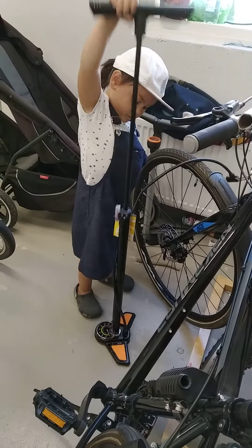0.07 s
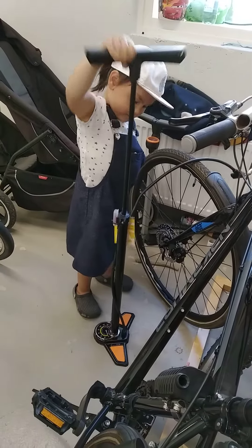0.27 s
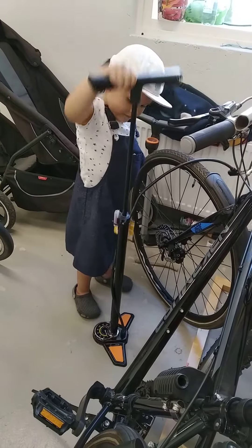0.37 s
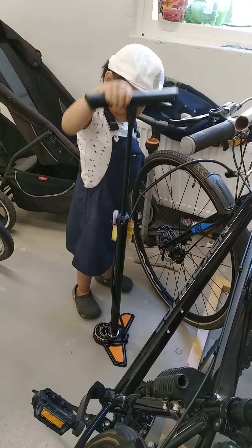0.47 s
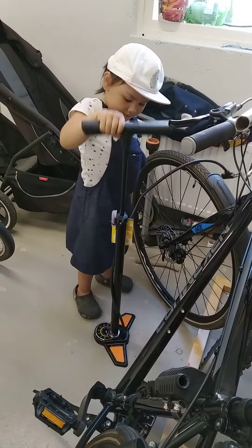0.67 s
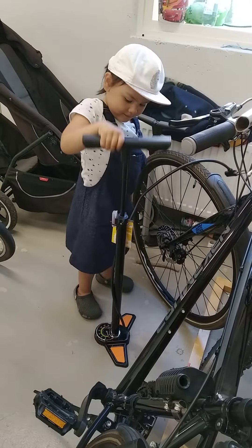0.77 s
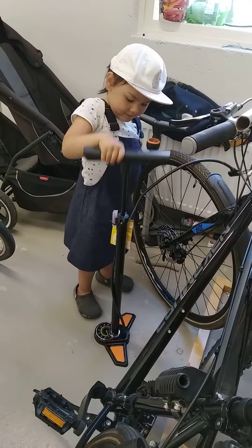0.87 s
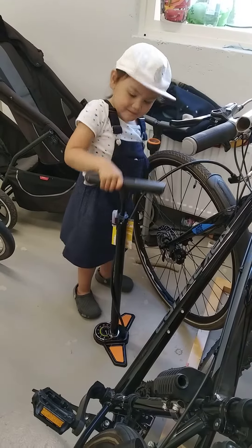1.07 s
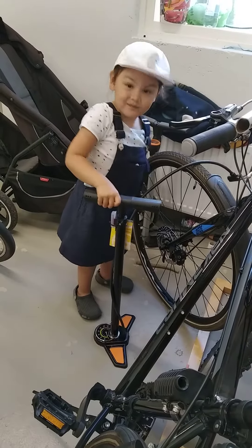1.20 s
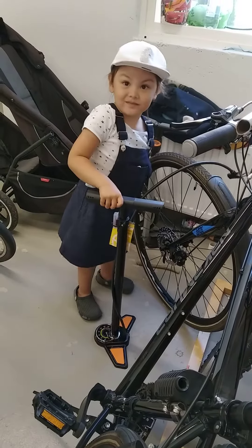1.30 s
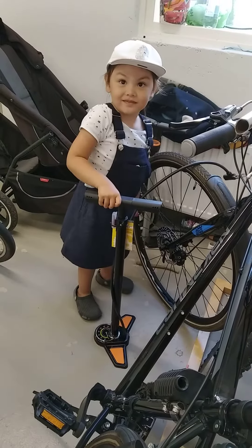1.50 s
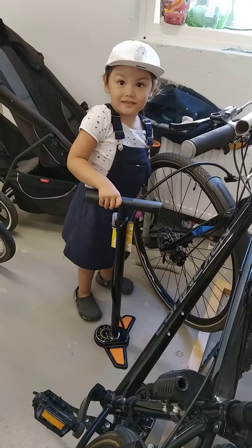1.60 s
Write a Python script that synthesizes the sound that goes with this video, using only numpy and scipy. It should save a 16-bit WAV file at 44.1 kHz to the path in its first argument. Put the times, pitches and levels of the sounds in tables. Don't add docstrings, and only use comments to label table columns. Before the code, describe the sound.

Close up in a hard-walled garage, a single pump stroke jets hissing air toward the right microphone, with a burst of metal clacks and scraping at first, faint rising hum, soft end tap, then fade-out.

```python
import sys
import numpy as np
from scipy import signal
from scipy.fft import rfft, irfft, next_fast_len
from scipy.io import wavfile
from scipy.ndimage import uniform_filter1d

SR = 44100
rng = np.random.default_rng(int(sys.argv[2]) if len(sys.argv) > 2 else 0)


def gain_from_decibels(decibels):
    exponent = np.asarray(decibels, float) / 20
    return 10 ** exponent


def waveform_to_disk(signal):
    frames = np.transpose(np.atleast_2d(signal))
    scaled = np.clip(frames, -1, 1) * 32767
    samples = np.round(scaled).astype(np.int16)
    wavfile.write(sys.argv[1], SR, samples)


N = 72765

# (frequency [Hz], level [dB])
SHADOW = [(60, -7), (330, 1.5), (800, -7.5), (1800, -3.5), (3000, -12.5), (6500, -27.5), (11500, -32),
          (13500, -59)]
# (frequency [Hz], level [dB], decay by 60 dB [s])
BARREL = [(429, -17.5, 0.1), (580, -3.5, 0.076), (757.5, -10, 0.083), (961, -12, 0.16),
          (1030.6, -1.25, 0.14), (1050.6, -12, 0.11), (1247, -13.5, .05), (1362, 4.5, 0.034),
          (1628, -1.5, 0.026), (1815, -12, 0.036), (2070, -4, 0.034), (2353, -8.5, 0.077),
          (2606, -6, 0.049), (3000, -32, 0.048)]


def rms_one(x):
    return x / np.sqrt(np.mean(x ** 2) + 1e-20)


def in_time(rows, outside=None):
    s, *cols = np.transpose(rows)
    return [np.interp(np.arange(N) / SR, s, c, outside, outside) for c in cols]


def at_hz(points, hz):
    table_hz, value = np.array(points)[:, 0], np.array(points)[:, 1]
    return np.interp(np.log(hz), np.log(table_hz), value)


def bin_hz():
    return np.maximum(np.fft.rfftfreq(N, 1 / SR), 1)


def drift(rate_hz):
    hop, settle = 40, 2000
    r = np.exp(-2 * np.pi * rate_hz * hop / SR)
    noise = rng.standard_normal(N // hop + settle + 2)
    slow = signal.lfilter([1], [1, -2 * r, r * r], noise)[settle:]
    return np.interp(np.arange(N) / hop, np.arange(len(slow)), rms_one(slow))


def sides(pan_db):
    balance = np.cosh(np.asarray(pan_db) * np.log(10) / 40)
    return gain_from_decibels(np.multiply.outer([.5, -.5], pan_db)) / balance


def swell(s, length):
    u = np.clip((np.arange(N) / SR - s) / length, 0, None)
    return u * np.exp(1 - u)


def ring(clicks, hz, t60):
    r = gain_from_decibels(-60 / (max(t60, .005) * SR))
    w = 2 * np.pi * hz / SR
    return signal.lfilter([.5, 0, -.5], [1, -2 * r * np.cos(w), r * r], clicks + 1e-18)


def air(spectrum, patchy_db, edge_hz, lowest_hz, bands, per_octave):
    # (frequency [Hz], likeness [0-1])
    likeness = [(60, 0.51), (180, 0.8), (550, 1), (1650, 0.5), (4970, -0.0), (15000, 0)]
    edge_db_per_octave, edge_depth_db = 40.5, 8.5
    hz = bin_hz()
    mid, side = rfft(rng.standard_normal((2, N))) * gain_from_decibels(at_hz(spectrum, hz))
    alike = np.clip(at_hz(likeness, hz), 0, 1)
    shared, apart = np.sqrt(1 + alike) * mid, np.sqrt(1 - alike) * side
    pair = np.array([shared + apart, shared - apart]) * sides(at_hz(SHADOW, hz))
    out, together = 0, drift(6.5)
    for k in range(bands):
        centre = lowest_hz * 2 ** (k / per_octave)
        mask = np.clip(1 - per_octave * abs(np.log2(hz / centre)), 0, 1)
        cut_db = np.clip(edge_db_per_octave * np.log2(edge_hz / centre), 0, edge_depth_db)
        flicker_db = patchy_db * (0.44 * together + drift(18))
        out = out + gain_from_decibels(flicker_db - cut_db) * irfft(pair * mask, N)
    return out / np.std(out.mean(axis=0))


def garage_hum():
    # (frequency [Hz], density [dB per Hz])
    hum_colour = [(40, -22.5), (80, -13.5), (125, -0.7), (200, -13), (330, -6), (1200, -4), (1900, -13),
                  (3400, -4)]
    # (time [s], level [dB])
    fader = [(0.05, -105), (0.1, -78), (0.2, -55.5), (0.6, -50), (1.0, -50.5), (1.36, -45.5), (1.47, -63),
             (1.65, -80.5)]
    hum = air(hum_colour, patchy_db=2, edge_hz=1, lowest_hz=40, bands=20, per_octave=3)
    return gain_from_decibels(in_time(fader, -140)[0]) * hum


def thumps():
    # (time [s], level [dB], frequency [Hz], length [s])
    plate_rocks = [
        (0.27, -49, 118, 0.05),
        (0.48, -42.5, 252, 0.0087),
        (0.83, -58.5, 140, 0.039),
        (0.92, -56, 143, 0.027),
        (1.07, -51, 134.8, 0.012),
        (1.295, -51, 163.2, 0.034),
    ]
    out = 0
    for s, db, hz, length in plate_rocks:
        tone = np.sin(2 * np.pi * hz * (np.arange(N) / SR - s))
        out = out + gain_from_decibels(db) * swell(s, length) ** 2 * tone
    return out


def column():
    # (time [s], frequency [Hz], level [dB])
    column_path = [(0.6, 341, -74), (0.68, 329.4, -64), (0.79, 347.7, -58), (0.86, 263, -71),
                   (0.96, 284.4, -57), (1.12, 331, -69), (1.19, 362.5, -56.5), (1.27, 367.4, -47),
                   (1.5, 377, -75)]
    wobble_hz, flutter_db, pan_db = 3, 2, 2.5
    hz, db = in_time(column_path)[0], in_time(column_path, -120)[1]
    phase = 2 * np.pi * np.cumsum(hz + wobble_hz * drift(14)) / SR
    tone = np.sqrt(2) * np.sin(phase)
    return gain_from_decibels(db + flutter_db * drift(17)) * tone * sides([pan_db])


def rub():
    # (time [s], level [dB])
    rubbing = [(0.22, -67), (0.24, -37.5), (0.33, -39.5), (0.38, -32.5), (0.44, -38.5), (0.52, -38.5),
               (0.62, -62.5), (0.75, -63), (1.15, -67), (1.27, -50.5), (1.34, -54.5), (1.42, -76)]
    # (frequency [Hz], density [dB per Hz])
    scrape_colour = [(300, -6.5), (1000, 5), (2500, 4.5), (4000, -3), (7500, 3.5), (8300, -28.5),
                     (11000, -4), (14000, -47.5)]
    slips_per_s, grain_db = 1200, 2
    chatter_db, chatter_pan_db = -8, -1
    scrape_db, scrape_pan_db = 6, 2.5

    strength = gain_from_decibels(grain_db * np.minimum(rng.exponential(1, N), 4))
    slips = strength * rng.choice([-1, 1], N) * (rng.random(N) < slips_per_s / SR)
    dealt = rng.random((len(BARREL), N)) < .5
    chatter = rms_one(sum(gain_from_decibels(db) * ring(slips * d, hz, t60) for d, (hz, db, t60) in zip(dealt, BARREL)))

    spectrum = rfft(rng.standard_normal((2, N))) * gain_from_decibels(at_hz(scrape_colour, bin_hz()))
    scrape = rms_one(irfft(spectrum, N)) * gain_from_decibels(1.6 * drift(30))

    both = gain_from_decibels(chatter_db) * chatter * sides([chatter_pan_db])
    both = both + gain_from_decibels(scrape_db) * scrape * sides([scrape_pan_db])
    return gain_from_decibels(in_time(rubbing, -120)[0]) * both


def knocks():
    # (time [s], level [dB], left-right [dB], pitch the contact favours [Hz], contact time [s])
    rod_hits = [(0.237, -31, -10, 900, .012), (0.25, -27.5, 4, 600, .03), (0.334, -21, 4, 580, 0.0035),
                (0.338, -21.5, 3, 1600, 0.0026), (0.372, -15, 6, 1020, 0.0016),
                (0.372, -24, 9.5, 1460, 0.0023), (0.399, -20, 9, 1640, 0.0014),
                (0.406, -21, 4.5, 1010, 0.0032), (0.418, -21, 6.5, 1025, 0.0087),
                (0.463, -16, 0.5, 2520, 0.012), (0.469, -25.5, -1, 1490, .01),
                (0.487, -16, 11, 1650, 0.003), (0.503, -24.5, 5, 1090, 0.014), (0.513, -23, 1, 1880, 0.014),
                (0.562, -35.5, 5.5, 1035, 0.0065), (0.636, -35, 3, 986, 0.0025),
                (1.267, -32, -2, 580, 0.01), (1.305, -34, -4, 1334, 0.0017), (1.306, -46, 4, 700, .008)]
    touch_cut_hz, clean_contact_s = 3500, 0.0026
    contact_db_per_octave, mode_spread_db = 14, 2.0
    grit_len, tail_len = 4000, 8000
    out = np.zeros((2, N))
    grit = rng.standard_normal((len(rod_hits), grit_len))
    luck = rng.standard_normal((len(rod_hits), len(BARREL)))
    soft = signal.butter(2, touch_cut_hz, fs=SR)
    for (s, db, pan_db, favoured_hz, contact_s), noise, spread in zip(rod_hits, grit, luck):
        gritty = contact_s / (contact_s + clean_contact_s)
        dying = np.exp(-np.arange(grit_len) / SR / contact_s) / np.sqrt(contact_s * SR / 2)
        push = gritty * noise * dying
        push[0] += 1 - gritty
        push = signal.lfilter(*soft, np.pad(push, (0, tail_len)) + 1e-18)
        body = 0
        for (hz, mode_db, t60), chance in zip(BARREL, spread):
            off_pitch_db = contact_db_per_octave * abs(np.log2(hz / favoured_hz))
            body = body + gain_from_decibels(mode_db - off_pitch_db + mode_spread_db * chance) * ring(push, hz, t60)
        i = int(s * SR)
        out[:, i:i + len(body)] += (gain_from_decibels(db) * sides([pan_db]) * body)[:, :N - i]
    return out


def garage(x):
    room_t60_s, wall_cut_hz, wide_hz = 0.47, 4100, 900
    size = next_fast_len(N + SR)
    z = np.exp(-2j * np.pi * np.arange(size // 2 + 1) / size)
    dull = np.exp(-2 * np.pi * wall_cut_hz / SR)
    wall = (1 - dull) / (1 - dull * z)
    out = np.zeros((2, len(z)), complex)
    for k, lag in enumerate((rng.uniform(.008, .04, 20) * SR).astype(int)):
        loop = gain_from_decibels(-60 * lag / SR / room_t60_s) * wall * z ** lag
        out[k % 2] += loop / (1 - loop) * (-1) ** (k // 2)
    wide = np.clip(np.arange(len(z)) * SR / size / wide_hz, 0, 1)
    out = wide * out + (1 - wide) * out[0]
    return irfft(out * rfft(x, size), size)[:, :N]


def whistles():
    # (time of peak [s], length [s], frequency [Hz], level over the flow [dB])
    nozzle_whistles = [
        (0.12, .04, 4380, -6.5),
        (0.72, 0.094, 4370, -10.5),
        (0.53, 0.032, 5700, -9.5),
        (0.38, .04, 6550, -9.5),
        (0.98, 0.11, 6000, -5),
    ]
    half_width_hz = 37
    out = 0
    for s, length, hz, db in nozzle_whistles:
        band = signal.butter(2, [hz - half_width_hz, hz + half_width_hz], "band", fs=SR, output="sos")
        tone = rms_one(signal.sosfilt(band, rng.standard_normal(N)))
        out = out + gain_from_decibels(db) * swell(s - length, length) ** 2 * tone * sides([at_hz(SHADOW, hz)])
    return out


def jet():
    # (time [s], level [dB])
    air_flow = [(0.05, -120), (0.072, -90), (0.106, -66.5), (0.204, -31.5), (0.268, -26), (0.402, -26.5),
                (0.49, -24.5), (0.9, -25), (0.936, -30.5), (1.288, -25.5), (1.346, -29), (1.458, -47.5),
                (1.65, -73.5)]
    # (frequency [Hz], density [dB per Hz])
    jet_colour = [(1500, -30), (2300, -13.5), (4100, -7.5), (6700, 1.5), (7600, -2), (8400, -15.5),
                  (11500, -22.5), (15800, -30)]
    # (time [s], frequency [Hz])
    lower_edge = [(0.1, 3600), (0.25, 3000), (0.5, 3560), (0.6, 4430), (0.88, 4080), (0.95, 2790),
                  (1.35, 2470), (1.65, 3390)]
    hiss = air(jet_colour, patchy_db=1.73, edge_hz=in_time(lower_edge)[0],
               lowest_hz=1400, bands=24, per_octave=6)
    return gain_from_decibels(in_time(air_flow, -140)[0]) * (hiss + whistles())


def scene():
    room_db = -16.5
    pump = rub() + knocks()
    return garage_hum() + thumps() + column() + pump + gain_from_decibels(room_db) * garage(pump) + jet()


def thin_top(x):
    from_hz, floor_db, line_db, band_db = 8193, -108, 0.5, -2.2
    hz, _, lines = signal.stft(x, SR, nperseg=2048, noverlap=1024)
    power = abs(lines) ** 2
    band = uniform_filter1d(power, size=14, axis=1)
    wide = uniform_filter1d(power, size=70, axis=1)
    strong_line = power > band * gain_from_decibels(2 * line_db)
    strong_band = (band > wide * gain_from_decibels(2 * band_db)) & (band > gain_from_decibels(2 * floor_db))
    kept = (strong_line & strong_band) | (hz < from_hz)[:, None]
    return signal.istft(lines * kept, SR, nperseg=2048, noverlap=1024)[1][:, :N]


def low_pass(x):
    return signal.sosfilt(signal.butter(12, 15960, fs=SR, output="sos"), x)


def record(dry):
    low_cut = signal.butter(2, 153, "high", fs=SR, output="sos")
    mix = thin_top(signal.sosfilt(low_cut, dry))
    return low_pass(mix)


dry = scene()
out = record(dry)
waveform_to_disk(out)
```